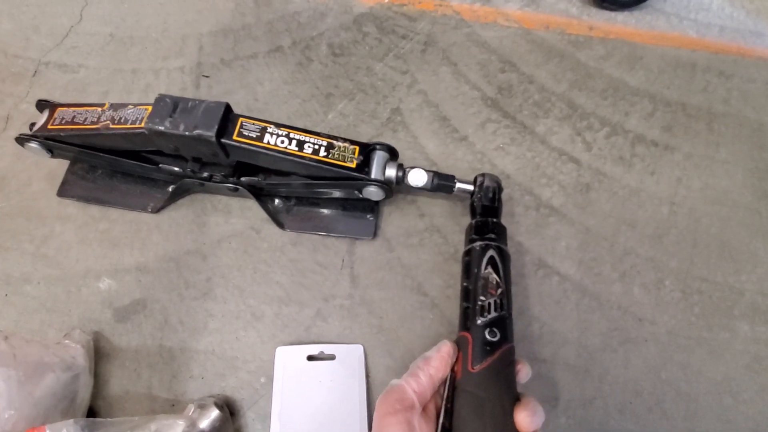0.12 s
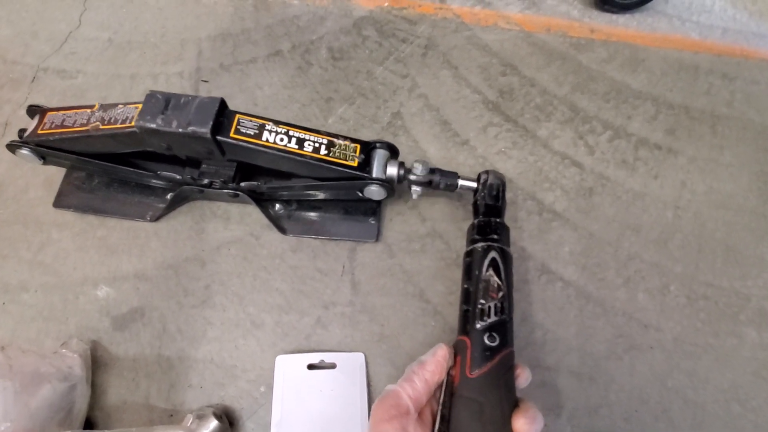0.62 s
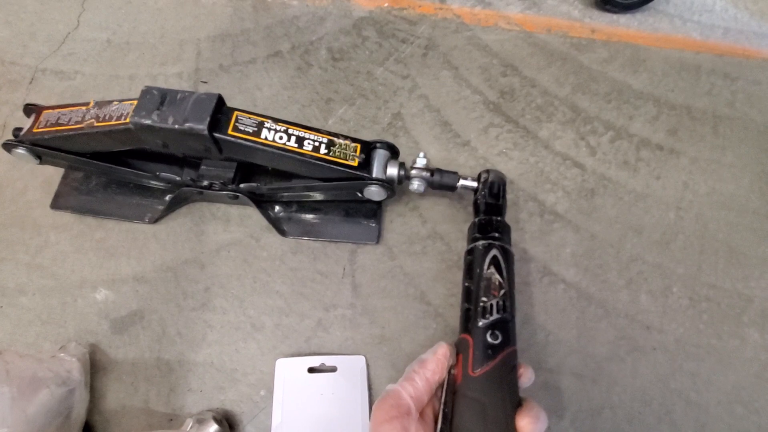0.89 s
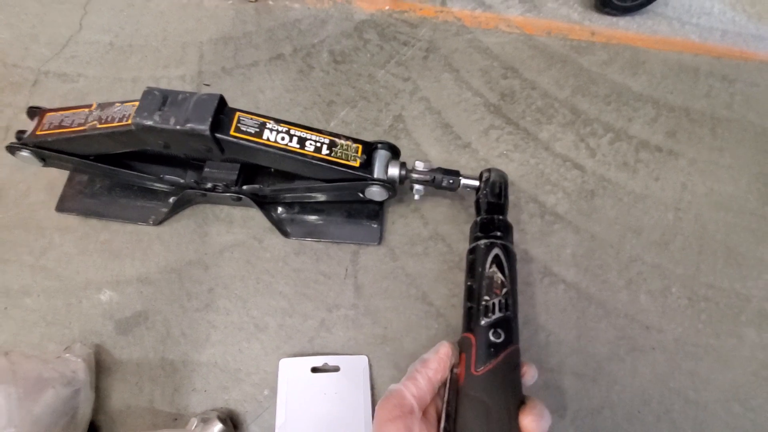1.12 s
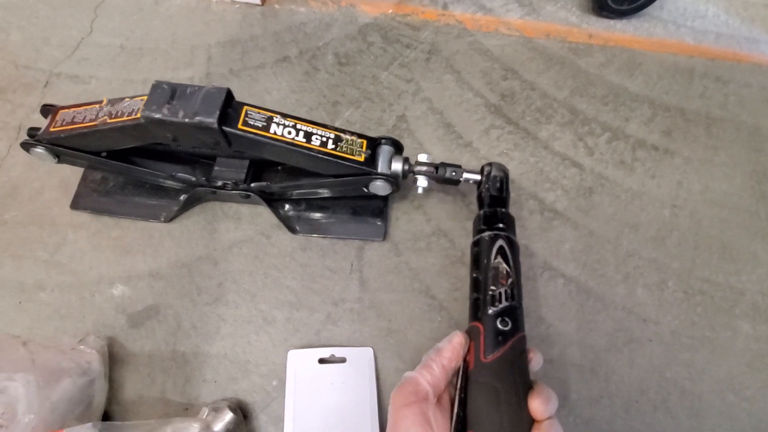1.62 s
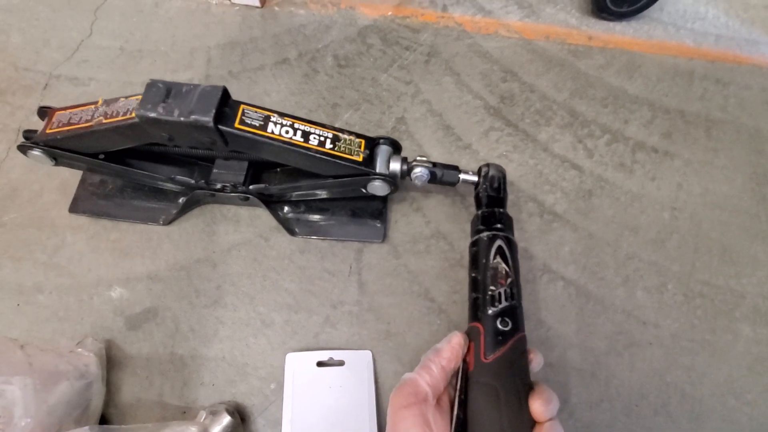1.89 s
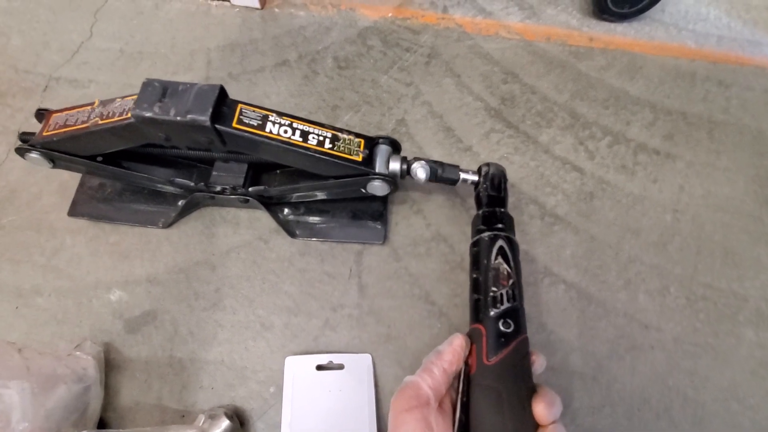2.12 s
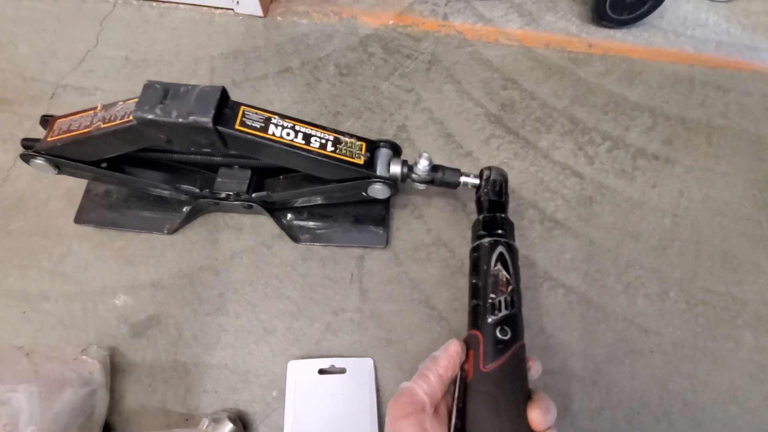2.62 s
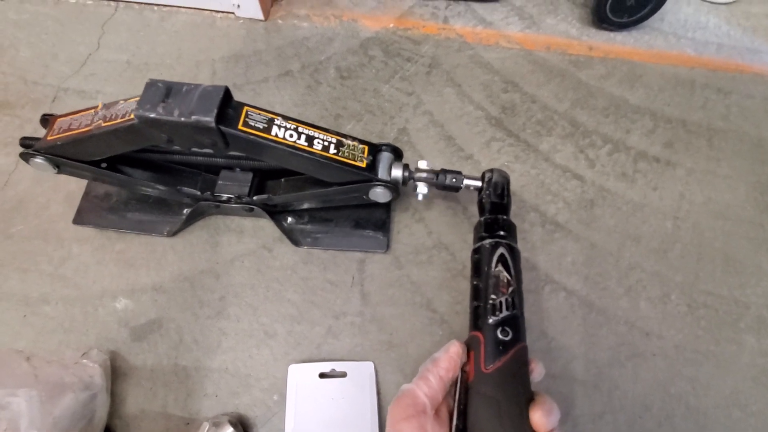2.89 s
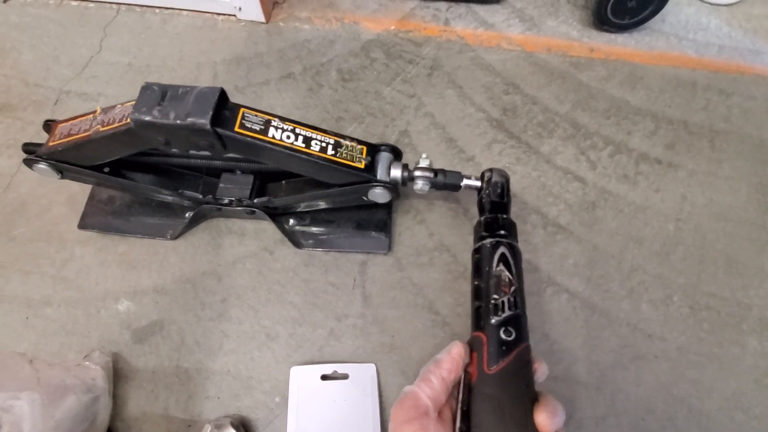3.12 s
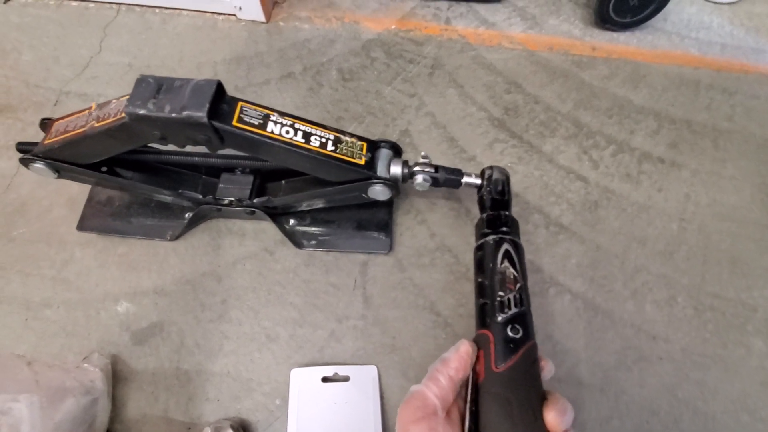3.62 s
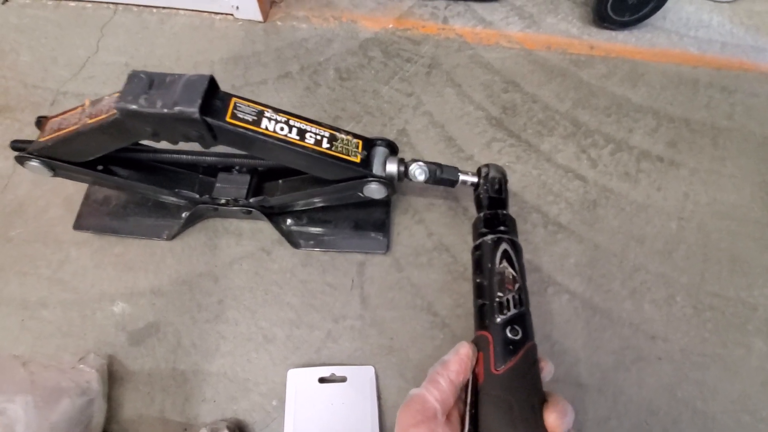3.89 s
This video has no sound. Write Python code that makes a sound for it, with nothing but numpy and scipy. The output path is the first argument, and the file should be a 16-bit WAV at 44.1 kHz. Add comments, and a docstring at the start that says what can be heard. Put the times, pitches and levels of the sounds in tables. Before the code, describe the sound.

A powered ratchet whirs and rattles rapidly as it turns a steel scissor jack's screw on concrete, very close to a stereo microphone; it slows twice, while the left channel crackles with pops.

```python
"""A drive whirs and hums at once: a powered ratchet turns the screw of a steel scissor jack on a concrete floor,
close to a stereo microphone. Whir is filtered noise and hum a set of harmonics, both tied to the stroke of the head.
The pawl knocks the steel twice a stroke, exciting decaying modes, and the drive bogs down twice under load.
The left microphone spits: short gated bursts of hiss, each ending in a dull pop made of filtered steps."""
import sys
import numpy as np
from scipy import signal
from scipy.fft import rfft, irfft
from scipy.io import wavfile

SR = 44100
rng = np.random.default_rng(int(sys.argv[2]) if len(sys.argv) > 2 else 0)


def transcribe(signal):
    """Save signal, clipped to [-1, 1], as a 16-bit WAV file at the path in sys.argv[1]."""
    frames = np.atleast_2d(signal).T
    limited = np.clip(frames, -1, 1)
    pcm = np.round(limited * 32767).astype(np.int16)
    wavfile.write(sys.argv[1], SR, pcm)


def elevation(decibels):
    """Turn decibel levels (scalar or array-like) into linear amplitude ratios."""
    levels = np.asarray(decibels, float)
    return 10 ** (levels / 20)


N = 176400

HALF_EACH_WAY = np.array([[.5], [-.5]])   # shares a left-minus-right level between the sides


def rms_one(x):
    """Normalization: a signal divided by its root mean square has unit rms."""
    return x / np.sqrt(np.mean(x ** 2) + 1e-20)


def drift(rate_hz):
    """Low-pass filtered noise: a double pole turns white noise into a slow random course of spread 1."""
    pole = np.exp(-16 * np.pi * rate_hz / SR)   # run at an eighth of the sample rate
    noise = rng.standard_normal(N // 8 + 4002)
    slow = signal.lfilter([1], [1, -2 * pole, pole * pole], noise)[4000:]   # the filter has settled
    return np.interp(np.arange(N) / 8, np.arange(len(slow)), rms_one(slow))


# Spectrum of the whir before it is scaled to level: (f/Hz, relative level per Hz/dB)
WHIR_SPECTRUM = [(25, -38), (45, -8.5), (75, -2.5), (120, -10), (350, -6.5), (1000, -6), (1130, -4),
                 (1700, 0.5), (3100, 0.5), (4300, -1), (6500, -1), (8700, -0.5), (9000, -5), (9500, -1.5),
                 (9750, -5.5), (12400, -6), (12900, -1.5), (14800, -1), (16000, -6)]
# Modulation by the stroke at the drive's fastest: (multiple of the stroke rate, swing/dB, phase/rad)
WHIR_MODULATION = [(1, 1.5, 0.61), (2, 0.88, 1.9), (3, 1.55, 5.04), (4, 0.86, 0.13)]
WHIR_PATCHY_DB, WHIR_FLUTTER_DB, WHIR_SHARED_DB = 0.6, 2.8, 0.8   # per band, per band and side, all bands
WHIR_PAN_DB = 0.3   # left up and right down by this much
RUMBLE_ALIKE, RUMBLE_TOP_HZ = 0.6, 130   # the two sides agree only in the bass
RUMBLE_PAN_DB = 8.5   # the rumble is stronger on the left
BODY_BANDS, BODY_THROB_DB, BODY_PLACE = 6, 0.5, 0.13   # bands under 3 kHz; swing; place of the peak (0-1)
THROB_GROWTH_PER_HZ = 0.034   # the treble throbs deeper as the drive slows


def whir(turns, speed_hz, level_db):
    """Amplitude-modulated noise: gear and bearing noise flickers and throbs in third-octave bands."""
    hz = np.maximum(np.arange(N // 2 + 1) * SR / N, 1)
    both, *own = rfft(rng.standard_normal((3, N)))
    alike = RUMBLE_ALIKE / (1 + (hz / RUMBLE_TOP_HZ) ** 4)
    f_hz, f_db = np.transpose(WHIR_SPECTRUM)
    colour = elevation(np.interp(np.log(hz), np.log(f_hz), f_db))
    spectrum = (np.sqrt(alike) * both + np.sqrt(1 - alike) * np.array(own)) * colour
    spectrum = spectrum * elevation(RUMBLE_PAN_DB * HALF_EACH_WAY / (1 + (hz / (2 * RUMBLE_TOP_HZ)) ** 4))

    throb_db = sum(db * np.cos(2 * np.pi * k * turns + phase) for k, db, phase in WHIR_MODULATION)
    throb_db = throb_db * (1 + THROB_GROWTH_PER_HZ * (speed_hz.max() - speed_hz))
    body_db = BODY_THROB_DB * np.cos(2 * np.pi * (turns - BODY_PLACE))
    shared_db = WHIR_SHARED_DB * drift(94)

    place = 3 * np.log2(np.maximum(hz, 700) / 700)   # third octaves above 700 Hz
    out = irfft(spectrum * np.clip(1 - place, 0, 1), N)   # the lowest part stays steady
    for band in range(1, 15):
        stroke_db = body_db if band <= BODY_BANDS else throb_db
        flutter_db = WHIR_FLUTTER_DB * np.array([drift(130), drift(85)])   # each side apart
        gain_db = stroke_db + shared_db + WHIR_PATCHY_DB * drift(9.0) + flutter_db
        out += elevation(gain_db) * irfft(spectrum * np.clip(1 - abs(place - band), 0, 1), N)
    return rms_one(out) * elevation(level_db) * elevation(2 * WHIR_PAN_DB * HALF_EACH_WAY)


# Harmonics of the stroke before gain and waver: (multiple of the stroke rate, rms level/dB, left minus right/dB)
HUM_HARMONICS = [(1, -53.5, 1), (2, -53, 1), (3, -55, 5), (4, -53, 1), (5, -55.5, -2), (6, -59.5, 5)]
HUM_WAVER_DB = 1.8
HUM_SAG_DB_PER_HZ = 0.3   # all multiples weaken but the second, which swells, as the drive slows


def hum(turns, speed_hz):
    """Harmonic synthesis: sines at the lowest multiples of the stroke rate, each wavering in level."""
    slack_hz = speed_hz.max() - speed_hz
    out = np.zeros((2, N))
    for k, db, pan_db in HUM_HARMONICS:
        sag_db = HUM_SAG_DB_PER_HZ * slack_hz * (-.5 if k == 2 else 1)
        level_db = db + HUM_WAVER_DB * drift(5.1) - sag_db + pan_db * HALF_EACH_WAY
        out += np.sqrt(2) * elevation(level_db) * np.sin(2 * np.pi * (k * turns + rng.random()))
    return out


def ring(clicks, hz, t60):
    """Impulse response of a damped resonator: a unit click starts a sine of height 1, down 60 dB after t60."""
    r, w = elevation(-60 / (t60 * SR)), 2 * np.pi * hz / SR
    return signal.lfilter([0, np.sin(w)], [1, -2 * r * np.cos(w), r * r], clicks + 1e-18)


# Modes of tool and jack before scaling to level: (f/Hz, relative strength/dB, 60 dB decay t/s,
# left minus right/dB, place in the stroke where it is struck hardest/0-1)
STEEL_MODES = [(1180, 3, .03, -5, 0), (1445, -4.5, .035, -4, 0), (1515, -4.5, .03, 3, 0),
               (1980, -4, .02, 1, 0), (2260, -5, .035, 4, 0), (2650, -5, .015, 0, .9),
               (3020, -5, .025, 0, .9), (3900, -3, .012, 2, .2), (5550, -2, .014, -5, .2),
               (6800, -4, .008, 5, .7), (8500, -3, .01, -6, .5), (9300, -4, .015, 5, .5),
               (12900, -5, .01, 3, .7), (14200, -5, .008, 1, .2)]
KNOCK_JITTER, KNOCK_SPREAD_DB = .12, 1   # timing spread in half strokes; strength spread
CHATTER_PER_S, CHATTER_DB = 550, -2   # loose impacts, relative to the knocks
MODE_SPREAD_DB, MODE_THROB_DB = 6, 7   # chance per impact, mode and side; swing once a stroke
MODE_DRIFT_DB = 2.6   # each mode swells and fades slowly by chance
LOW_RING_FADE_DB_PER_S = 7   # the lowest mode weakens steadily
OPPOSED_BELOW_HZ = 1480   # lower modes reach the two sides in opposite phase
STEEL_FLOOR_HZ = 1000


def knocks(turns, level_db):
    """Modal excitation: two uneven knocks a stroke and loose chatter set the modes ringing on each side."""
    count = int(2 * turns[-1])
    jitter, spread = rng.standard_normal((2, count))
    struck = np.searchsorted(2 * turns, np.arange(count) + 1 + KNOCK_JITTER * jitter).clip(0, N - 1)
    loose = np.flatnonzero(rng.random(N) < CHATTER_PER_S / SR)
    loose_db = CHATTER_DB + KNOCK_SPREAD_DB * rng.standard_normal(len(loose))
    at = np.r_[struck, loose]
    size_db = np.r_[KNOCK_SPREAD_DB * spread, loose_db]

    out = np.zeros((2, N))
    for k, (hz, db, t60, pan_db, place) in enumerate(STEEL_MODES):
        slow_db = MODE_DRIFT_DB * drift(7.9)[at] + pan_db * HALF_EACH_WAY
        if k == 0:
            slow_db = slow_db - LOW_RING_FADE_DB_PER_S * at / SR
        throb_db = MODE_THROB_DB * np.cos(2 * np.pi * (turns[at] - place))
        chance_db = MODE_SPREAD_DB * rng.standard_normal((2, len(at)))
        sign = rng.choice([-1, 1], (2, len(at)))
        if hz < OPPOSED_BELOW_HZ:
            sign[1] = -sign[0]
        clicks = np.zeros((2, N))
        clicks[:, at] = sign * elevation(db + size_db + chance_db + slow_db + throb_db)
        out += ring(clicks, hz, t60)
    out = signal.sosfilt(signal.butter(2, STEEL_FLOOR_HZ, "high", fs=SR, output="sos"), out)
    return rms_one(out) * elevation(level_db)


# Ends of the bursts in the left microphone: (t/s)
SPIT_ENDS = [0.0374, 0.058, 0.0662, 0.0806, 0.0899, 0.1425, 0.1835, 0.1917, 0.204, 0.2238, 0.2313, 0.265,
             0.2858, 0.3087, 0.328, 0.3539, 0.3596, 0.3752, 0.41, 0.4293, 0.447, 0.4698, 0.4898, 0.498,
             0.5169, 0.536, 0.5597, 0.5615, 0.5775, 0.5923, 0.6122, 0.6191, 0.641, 0.6813, 0.691, 0.7019,
             0.7125, 0.733, 0.753, 0.7752, 0.796, 0.813, 0.835, 0.8565, 0.8607, 0.8775, 0.8959, 0.9075,
             0.9271, 0.9356, 0.9435, 0.957, 0.9973, 1.008, 1.0191, 1.0239, 1.0473, 1.0519, 1.079, 1.089,
             1.1014, 1.148, 1.198, 1.46, 1.464, 1.475, 1.4852, 1.527, 1.5404, 1.5475, 1.552, 1.561, 1.571,
             1.583, 1.589, 1.603, 1.6125, 1.6236, 1.6326, 1.6431, 1.6634, 1.6919, 1.703, 1.7251, 1.734,
             1.7544, 1.7665, 1.7959, 1.806, 1.815, 1.829, 1.8356, 1.8488, 1.8758, 1.887, 1.8949, 1.9187,
             1.9491, 1.9726, 1.9765, 1.9894, 2.019, 2.0342, 2.0387, 2.046, 2.0572, 2.068, 2.0786, 2.0881,
             2.1296, 2.1379, 2.15, 2.1575, 2.1688, 2.229, 2.2523, 2.2607, 2.271, 2.2916, 2.3129, 2.3195,
             2.3358, 2.3404, 2.3812, 2.3987, 2.4315, 2.4329, 2.4583, 2.4714, 2.515, 2.5217, 2.533, 2.5423,
             2.5512, 2.599, 2.622, 2.632, 2.6627, 2.682, 2.7147, 2.739, 2.7445, 2.7602, 2.7988, 2.8193,
             2.8225, 2.8254, 2.835, 2.8438, 2.854, 2.876, 2.8814, 2.8936, 2.9451, 2.9646, 2.9823, 3.0033,
             3.0161, 3.022, 3.0254, 3.043, 3.0658, 3.096, 3.1032, 3.1169, 3.122, 3.136, 3.1617, 3.1764,
             3.185, 3.1972, 3.2059, 3.216, 3.2425, 3.2478, 3.2652, 3.3051, 3.3396, 3.3657, 3.378, 3.4168,
             3.4365, 3.4438, 3.4467, 3.4972, 3.5034, 3.5093, 3.5232, 3.529, 3.5428, 3.553, 3.566, 3.577,
             3.5897, 3.6237, 3.626, 3.6996, 3.7273, 3.748, 3.759, 3.8356, 3.8574, 3.8682, 3.8735, 3.8781,
             3.8977, 3.912, 3.938, 3.952, 3.9795, 3.9919, 3.9985]
SPIT_MIN_MS, SPIT_MEAN_MS, SPIT_MAX_MS = .4, .7, 2.8   # least length, mean chance excess, longest
SPIT_GROWTH_MS_PER_S = .1   # the mean excess grows with time
SPIT_HISS_DB, SPIT_RISE_MS, SPIT_LOW_HZ, SPIT_HIGH_HZ = -11.5, .3, 2500, 15000
# pop level and chance spread; bursts of any length pop about equally hard
POP_DB, POP_SPREAD_DB, POP_FULL_MS = -1, 0.85, 0.15
POP_WINDUP_MS, POP_WINDUP_SHARE, POP_SNAP_MS = 0.54, 0.5, 0.14   # mean durations; share of the jump
POP_START_SHARE = 0.36   # a burst also begins with a snap the other way, of chance size
POP_FLOOR_HZ, POP_LOW_HZ, POP_RIPPLE_DB, POP_HIGH_HZ = 217, 305.6, 3, 2350
DUCK_DB, DUCK_MS = -7, 6   # deepest dip and its decay time


def spits():
    """Gated noise and filtered steps: bursts hiss, swing, and snap back into a pop; also returns the gain dip."""
    gate, slope, after = np.zeros(N + SR), np.zeros(N + SR), np.zeros(N)
    per_ms = SR / 1000
    wind = max(int(POP_WINDUP_MS * per_ms), 1)
    chance = rng.random((len(SPIT_ENDS), 6))
    for s, (side, size, length, snap, lead, slow) in zip(SPIT_ENDS, chance):
        excess_ms = -(SPIT_MEAN_MS + SPIT_GROWTH_MS_PER_S * s) * np.log(1 - length)
        ms = min(SPIT_MIN_MS + excess_ms, SPIT_MAX_MS)
        end, span = min(int(s * SR), N - 1), int(ms * per_ms)
        rise = np.minimum(np.arange(span) / (SPIT_RISE_MS * per_ms), 1)
        gate[end - span + wind // 2:end + wind // 2] = rise

        jump_db = POP_DB + POP_SPREAD_DB * (5.86 * size - 2.0)
        jump = np.sign(side - .5) * elevation(jump_db) * np.tanh(.5 + ms / POP_FULL_MS)
        width = 1 + int(2 * snap * POP_SNAP_MS * per_ms)
        swing = 1 + int(2 * slow * wind)
        start = end - width // 2
        slope[start - swing:start] -= jump * POP_WINDUP_SHARE / swing
        slope[start:start + width] += jump / width
        slope[end - span - wind] -= jump * POP_START_SHARE * 2 * lead * np.tanh((ms / 2) ** 2)
        after[end] = np.tanh(ms / 2)

    pop_filter = np.vstack([
        signal.cheby1(2, POP_RIPPLE_DB, POP_LOW_HZ, "high", fs=SR, output="sos"),
        signal.butter(2, POP_FLOOR_HZ, "high", fs=SR, output="sos"),
        signal.butter(1, POP_HIGH_HZ, fs=SR, output="sos")])
    pops = signal.sosfilt(pop_filter, np.cumsum(slope[:N]))   # slopes add up to steps
    hiss_filter = signal.butter(1, [SPIT_LOW_HZ, SPIT_HIGH_HZ], "band", fs=SR, output="sos")
    hiss = elevation(SPIT_HISS_DB) * gate[:N] * signal.sosfilt(hiss_filter, rng.standard_normal(N))

    trail = signal.lfilter([1], [1, -np.exp(-1 / (DUCK_MS * per_ms))], after)
    duck = elevation(DUCK_DB * np.minimum(trail, 1))
    return hiss + pops, duck


# Course of the drive: (t/s, stroke rate f/Hz, whir level/dB, knock level relative to the whir/dB, hum gain/dB)
DRIVE_COURSE = [(0, 42.76, -19.5, -2, 8), (.15, 47.47, -17.5, -5.5, -7), (0.399, 49.24, -20, -5, 3),
                (0.752, 49.2, -20.5, -4.5, 2), (1.05, 48.92, -20, -8, 1), (1.19, 41.17, -25, -3.5, 6),
                (1.34, 34.42, -25.5, -5, 8), (1.409, 36.57, -25.5, -16, -3), (1.47, 41.12, -21.5, -1.5, 8),
                (1.58, 46.77, -20, -9, 0.5), (1.99, 50.01, -20.5, -9, 2.5), (2.432, 49.6, -20, -7.5, 0.5),
                (2.949, 49.23, -19.5, -9.5, 3), (3.5, 49.64, -20, -6, 4.5), (3.62, 41.9, -24, -9, 4),
                (3.71, 36.4, -26, -2, 2), (3.781, 38.44, -23, -13, 1), (3.838, 41.4, -19.5, -7.5, 2),
                (4, 44.9, -20, -7.5, -4)]


def scene():
    """Superposition: whir, knocks and hum share one stroke phase; the left side dips after each spit."""
    s, *columns = np.transpose(DRIVE_COURSE)
    speed_hz, whir_db, knock_db, hum_db = [np.interp(np.arange(N) / SR, s, c) for c in columns]
    turns = np.cumsum(speed_hz) / SR   # strokes completed
    out = whir(turns, speed_hz, whir_db)
    out = out + hum(turns, speed_hz) * elevation(hum_db)
    out = out + knocks(turns, whir_db + knock_db)
    spit, duck = spits()
    out[0] = out[0] * duck + spit
    return out


def band_limit(x):
    """A steep low-pass at the top of the band."""
    return signal.sosfilt(signal.butter(12, 17100, fs=SR, output="sos"), x)


LEFT_TOP = 1.1   # ceiling of the left side
CUTOFF_HZ = 15720


def record(dry):
    """Saturation and band limiting: the left side rounds its peaks, and a steep low-pass cuts the top."""
    rounded = np.array([LEFT_TOP * np.tanh(dry[0] / LEFT_TOP), dry[1]])
    low_pass = signal.ellip(12, .3, 75, CUTOFF_HZ, fs=SR, output="sos")
    mix = signal.sosfilt(low_pass, rounded)
    return band_limit(mix)


dry = scene()
out = record(dry)
transcribe(out)
```